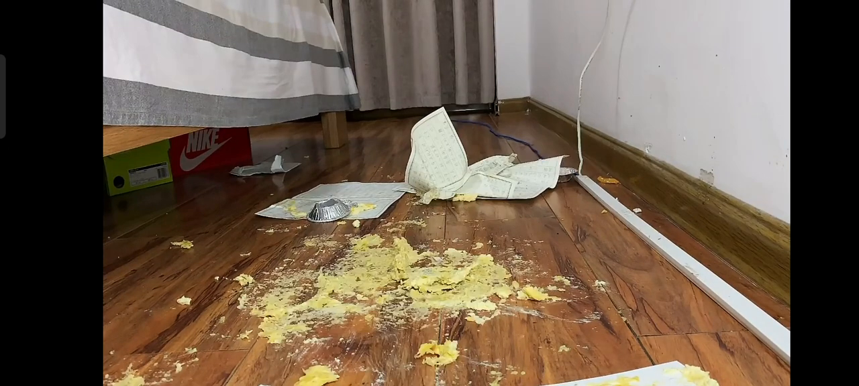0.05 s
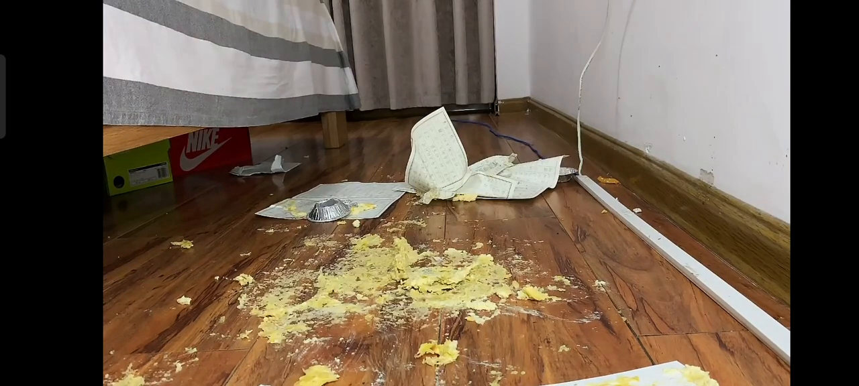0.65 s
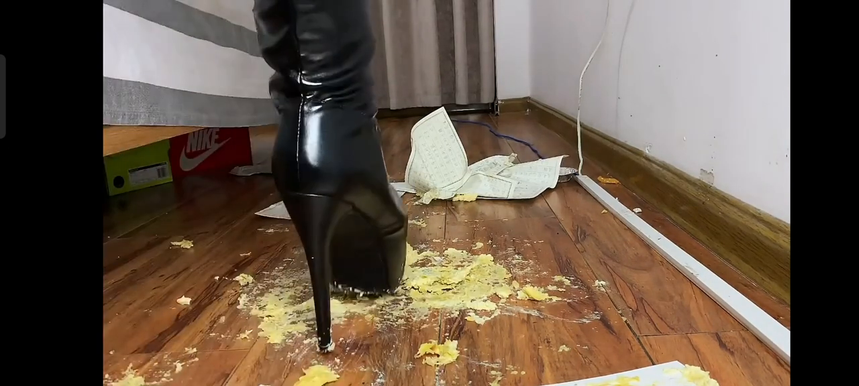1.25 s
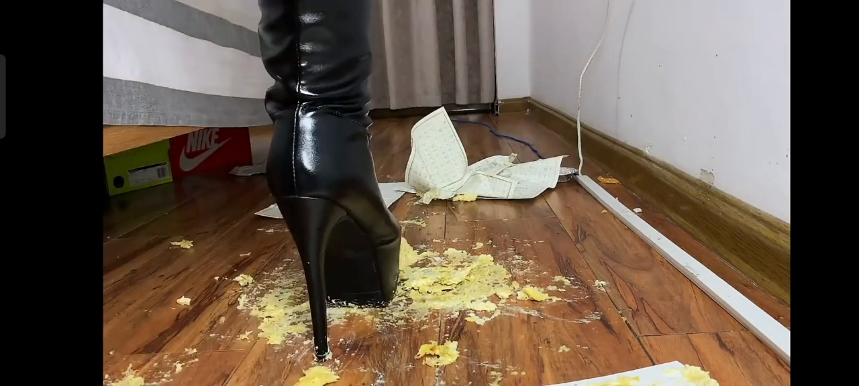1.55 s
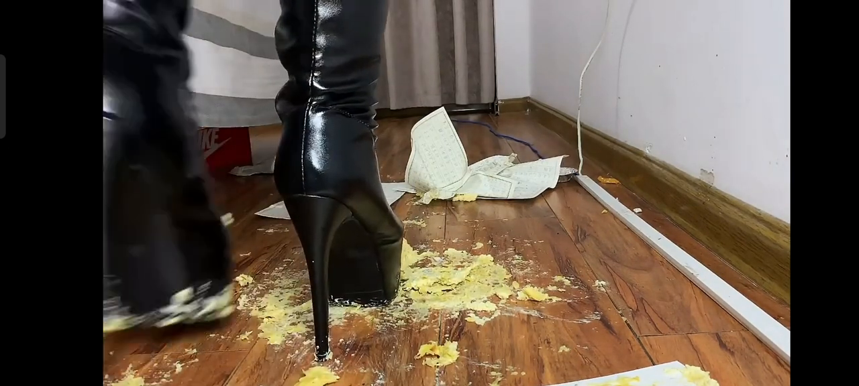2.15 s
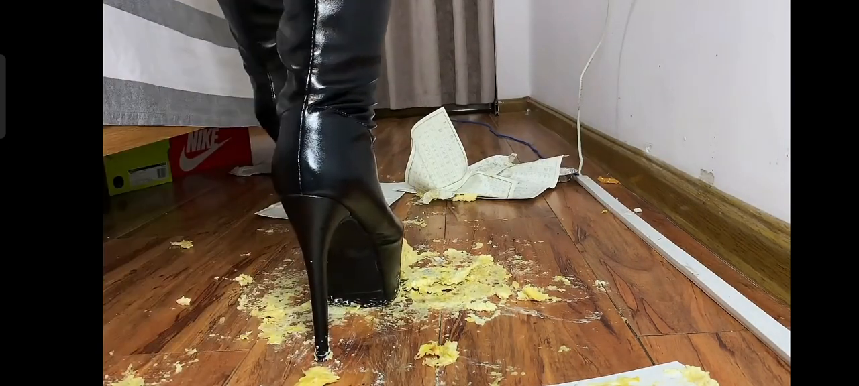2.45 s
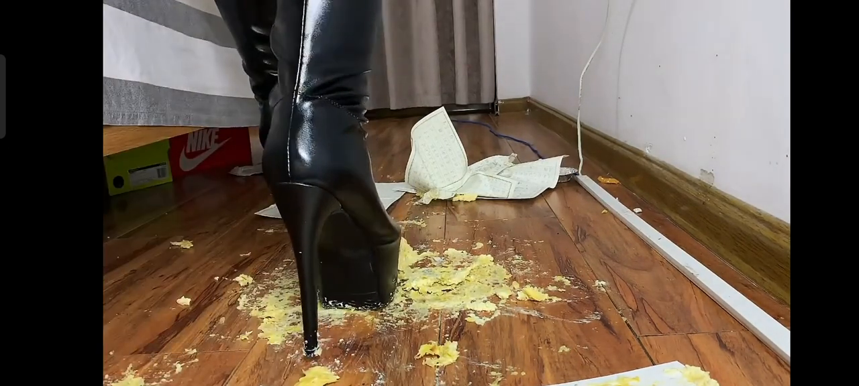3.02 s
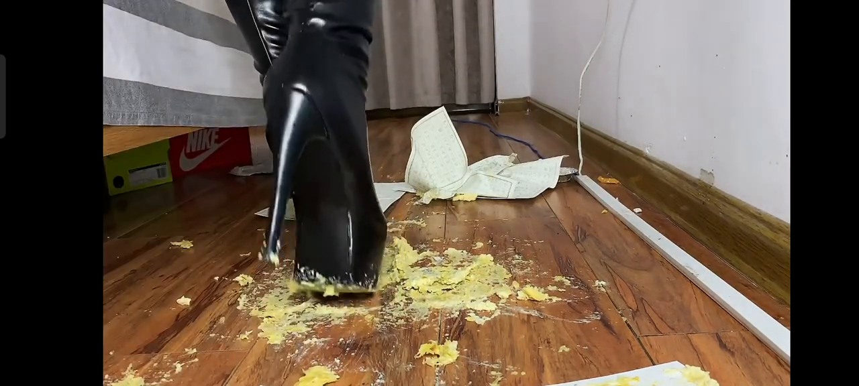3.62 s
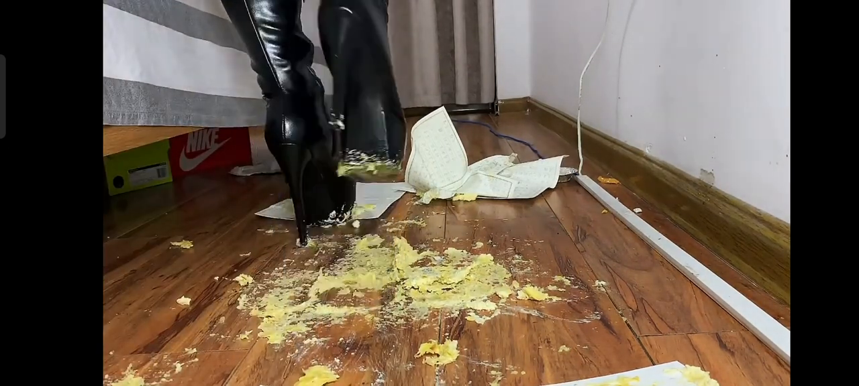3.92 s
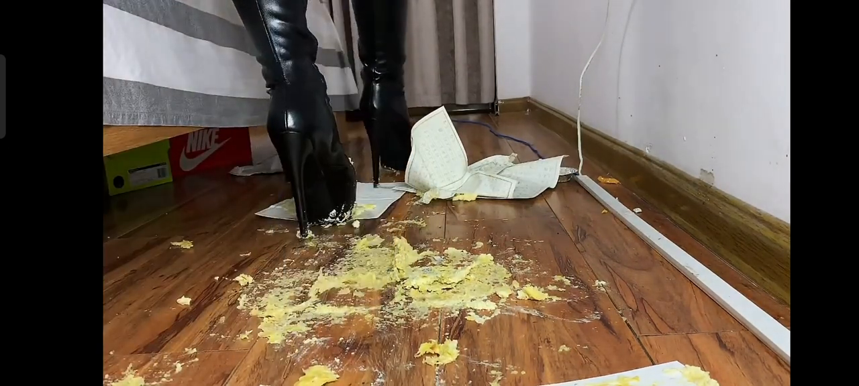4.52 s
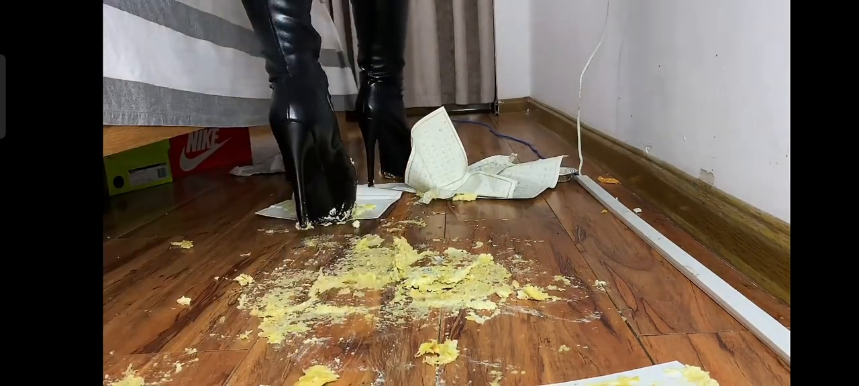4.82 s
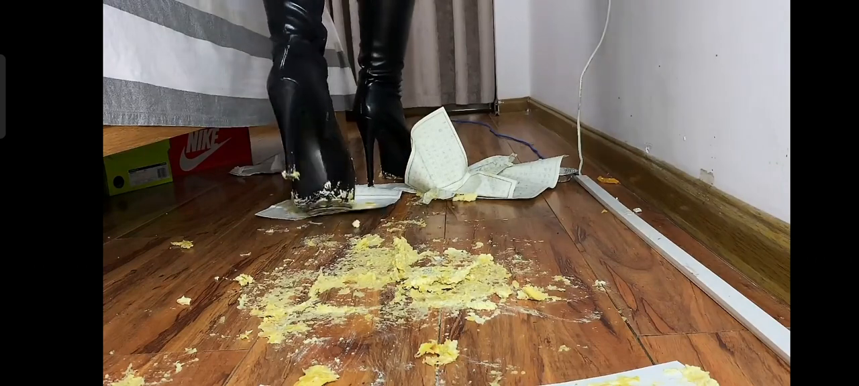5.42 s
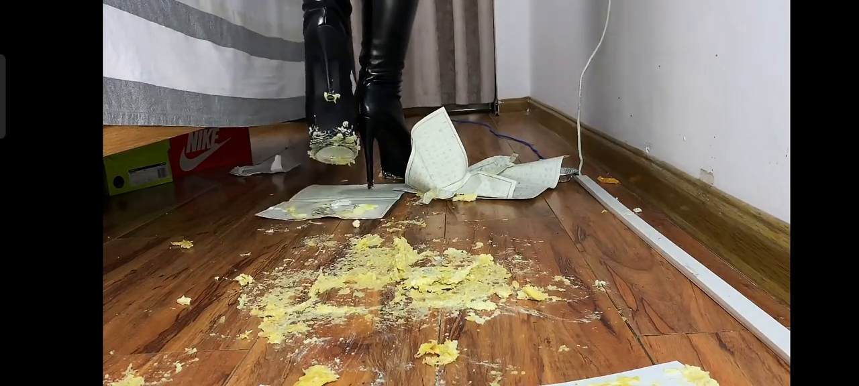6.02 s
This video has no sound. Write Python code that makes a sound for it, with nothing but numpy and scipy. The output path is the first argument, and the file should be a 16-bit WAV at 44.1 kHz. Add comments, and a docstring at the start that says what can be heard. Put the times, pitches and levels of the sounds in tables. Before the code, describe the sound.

High-heeled boots thud down on soft food on a wooden floor, grinding it with wet squishes and crackles, then crinkling paper.

```python
"""Boots stamping on soft food

Platform boots stamp on soft food on a wooden floor in a small room, then grind it and tread on paper.
Each stamp sends a bending wave through the boards, and the floor flexes under the weight. The mush
squirts out, air pockets pop in it, and the twisting sole squeaks and smears it with a fine wet crackle.
Last, the paper crinkles and peels off the boot. A faint rumble and hiss lie under it all."""
import sys
import numpy as np
from scipy import signal
from scipy.fft import rfft, irfft, next_fast_len
from scipy.io import wavfile

SR = 44100
rng = np.random.default_rng(int(sys.argv[2]) if len(sys.argv) > 2 else 0)


def inscribe(sig):
    """Save sig as 16-bit PCM at rate SR to the path in sys.argv[1].

    A 1-D sig is mono; a 2-D sig holds one channel per row.
    Samples are clipped to [-1, 1] before scaling.
    """
    pcm = np.round(np.clip(np.atleast_2d(sig).T, -1, 1) * 32767)
    wavfile.write(sys.argv[1], SR, pcm.astype(np.int16))


N = 276507
TIME = np.arange(N) / SR


def stamps(travel_s=0.003005, bass_hz=175, dip_hz=520, dip_db=-5, crack_hz=2800, rattle_db=-20,
           rattle_s=0.012, touch_db=-24, touch_s=0.0081, squash_db=-33, squash_s=0.011):
    """A blow spreads through the boards as a bending wave, treble first, and leaves them ringing."""
    # sole or heel lands: (time [s], level [dB], pitch [Hz], ringing [dB], softness [no unit], crack [dB])
    blows = [(0.04, -29, 730, -9, 1.34, -55), (1.2071, -2, 547, -24.5, 3.17, -43),
             (1.8875, -29, 804, -45, 2.6, -26), (2.6252, -1.5, 756, -22.5, 5, -39.5),
             (3.961, -19, 506, -13.5, 3.9, -38.5), (4.4095, -9.5, 615, -16, 5.8, -39.5)]
    # the notes the floorboards ring at: (pitch [Hz], level [dB], time to fade by 60 dB [s])
    board_notes = [(78.6, 6.5, 0.8), (174, 4.5, 0.33), (196, -1, 0.54), (262, -1.5, 0.33),
                   (310.7, -10, 0.68), (434.6, -1.5, 0.22), (498, -11, 0.435), (553.5, -6, 0.35),
                   (692, 4.5, 0.15), (726, -29, 0.098), (864, -5.5, 0.5)]
    out, size, lead_s = np.zeros(N), 32768, 0.03
    hz, t = np.arange(size // 2 + 1) * SR / size + 1, TIME[:size]
    bending = np.exp(-4j * np.pi * travel_s * np.sqrt(1000 * hz) - 2j * np.pi * hz * lead_s)

    def noise(spectrum):
        return rms_one(irfft(spectrum * np.exp(2j * np.pi * rng.random(len(hz)))))
    for s, level_db, pitch, ring_db, softness, crack_db in blows:
        shape = (hz / bass_hz) ** 2.635 / (1 + (hz / bass_hz) ** 3)   # small planks give little bass
        shape /= (1 + (hz / pitch) ** (2 * softness)) ** 0.59   # a soft landing cuts the treble
        shape *= from_db(dip_db * bump(hz, dip_hz, dip_hz / 4))   # two board notes partly cancel here
        shape += from_db(crack_db) * bump(hz, crack_hz, crack_hz) ** 2
        wave = shape / shape.max() * bending
        knock = irfft(wave)
        knock /= np.abs(knock).max()
        notes = sum(from_db(db + rng.normal(0, 1) - 60 * t / fade_s) * np.cos(2 * np.pi * note_hz * t)
                    for note_hz, db, fade_s in board_notes)
        ringing = irfft(wave * rfft(notes))
        # the wave comes back from the ends of the planks
        rattle = noise(shape) * t / rattle_s * np.exp(1 - t / rattle_s)
        # the soft food gives way just before the sole meets wood
        squash = noise(shape) * np.exp(-np.abs(t - 2 * lead_s) / squash_s)
        add(out, s - 2 * lead_s, from_db(level_db + squash_db) * squash)
        add(out, s - lead_s - touch_s, from_db(level_db + touch_db) * knock)   # a light first touch
        add(out, s - lead_s, from_db(level_db) * (knock + from_db(ring_db) * ringing))
        add(out, s + travel_s, from_db(level_db + rattle_db) * rattle)
    return out


def pops(gain_db=-12.5, ring_db=4, cavity_db=8.5, cavity_width_hz=110, rise_s=0.0006, fall_s=0.0019,
         stretch_db=-19, stretch_s=0.01, delay_s=0.0019):
    """Each air pocket stretches, tears in a cluster of clicks and rings at a pitch set by its size."""
    # air pockets and crumbs burst: (time [s], level [dB], pitch [Hz], treble [dB])
    bursts = [(0.658, -31, 2450, -39), (0.819, -26, 1320, -5), (0.8926, -17.5, 3320, -11),
              (1.229, -15.5, 2760, -16), (1.5481, -16.5, 5700, -6), (1.579, -23.5, 5750, -10),
              (1.711, -23.5, 4140, -16), (1.886, -19, 2290, -21), (2.6472, -6.5, 1220, -41),
              (2.68, -26, 8500, 5), (2.785, -3, 2410, -12.5), (2.83, -9, 6640, -12), (2.8506, -3, 2570, -4),
              (2.8698, -1.5, 4250, -15.5), (2.891, -6.5, 3200, -8), (2.9607, -6.5, 1940, -15.5),
              (3.0509, -20.5, 2160, -12), (3.131, -24.5, 7840, 3), (3.1868, -11.5, 3350, -12.5),
              (3.3044, -20.5, 3460, -12), (3.44, -18.5, 8170, -9), (3.459, -17.5, 8100, -2),
              (3.5943, -18.5, 1640, -26), (3.687, -20.5, 1280, -3), (3.726, -17, 1580, -11),
              (3.9618, -5, 2880, -52), (3.9715, -11, 2740, -55), (4.16, -27, 2040, -26),
              (4.4367, -7, 4480, -9), (4.6098, -15, 2266, -23), (4.719, -37, 4580, -36.5),
              (4.742, -13.5, 8750, -3), (4.8357, -16, 3190, -14.5), (4.9635, -10, 4000, -12.5),
              (5.0753, -21.5, 4700, -16), (5.177, -20, 4530, -13), (5.1952, -11.5, 5010, -22),
              (5.309, -20.5, 6560, -9), (5.3565, -12.5, 6800, -6.5), (5.457, -13.5, 2420, -10),
              (5.7622, -15, 1950, -5), (5.904, -20.5, 1650, -16)]
    out, lead_s = np.zeros(N), 0.015
    t = TIME[:SR // 12] - lead_s
    tear = np.exp(np.minimum(t / rise_s, -t / fall_s))
    tear += from_db(stretch_db) * np.exp(-np.abs(t) / stretch_s)
    tear_rms = np.sqrt(np.mean(tear ** 2))
    for s, level_db, ring_hz, treble_db in bursts:
        body_db = 1 - 16 * np.log2(ring_hz / 2860)   # a smaller pocket rings higher and has less body
        outline = [(100, body_db - 18), (600, body_db - 8), (1300, body_db), (3000, -1), (6500, 0.49),
                   (11000, treble_db + 4), (16000, treble_db - 1)]

        def tone(hz):
            ring = ring_db * bump(hz, ring_hz, ring_hz) + cavity_db * bump(hz, ring_hz, cavity_width_hz)
            return at_hz(outline, hz) + ring + resonances_db(hz)
        burst = colour(tear * grains(len(t), per_s=14000, spread_db=3), tone)
        add(out, s + delay_s - lead_s, from_db(level_db + gain_db) * tear_rms * burst)
    return out


def squirts(fall_s=0.0067, even_hz=3400, focus_db=9):
    """Mush shoots out in a dense rush of tiny wet bursts, over within a few hundredths of a second."""
    # mush squirts, scuffs or tears loose:
    # (time [s], level [dB], rise [s], hold [s], centre pitch [Hz], highest treble [dB])
    spurts = [(0.572, -45.5, 0.012, 0.013, 655, -10), (1.256, -35, 0.0041, 0.0045, 5450, -16),
              (2.652, -27, 0.0029, 0.044, 1680, -1), (2.653, -23.5, 0.0043, 0.019, 4260, -12.5),
              (2.851, -28, 0.003, 0.035, 4340, -9), (3.952, -19, 0.023, 0.0037, 2420, -31.5),
              (4.433, -30, 0.0071, 0.0069, 5660, -20), (4.445, -34.5, 0.0091, 0.031, 2500, -13),
              (4.737, -45, 0.005, 0.044, 7760, -5), (5.19, -32.5, 0.0016, 0.015, 11400, -10),
              (5.339, -41, 0.014, .008, 6500, -12), (5.425, -36, 0.024, 0.005, 4680, -10),
              (5.465, -32, 0.012, 0.01, 2110, -25), (5.577, -34.5, 0.0035, 0.0048, 1590, -34),
              (5.631, -44, 0.022, 0.019, 4130, -1)]
    out, t = np.zeros(N), TIME[:SR // 4]
    for s, level_db, rise_s, hold_s, centre_hz, treble_db in spurts:
        tilt_db_per_octave = 4 * np.log2(centre_hz / even_hz)   # higher squirts lean towards the treble

        def tone(hz):
            focus = focus_db * bump(hz, centre_hz, centre_hz)
            octaves = np.log2(np.maximum(hz, centre_hz / 2) / centre_hz)
            ends = at_hz([(100, -20), (600, 0), (5000, 0), (16000, treble_db)], hz)
            return focus + tilt_db_per_octave * octaves + ends + resonances_db(hz)
        swell = np.minimum(t / rise_s, 1) ** 0.82
        fade = np.exp(-np.maximum(t - rise_s - hold_s, 0) / fall_s)
        clicks = grains(len(t), per_s=5000, spread_db=4) * from_db(drift(per_s=315)[:len(t)])
        add(out, s, from_db(level_db) * swell * fade * colour(clicks, tone))
    return out


def floor_flexes(swell_s=0.02, octave_db=-14):
    """The floor gives under the weight and swings a few times at its two lowest notes."""
    # the weight shifts: (time [s], level [dB], pitch [Hz])
    shifts = [(0.927, -25.5, 60.3), (0.986, -34, 86.3), (1.249, -36, 64), (2.18, -38, 51.2),
              (2.655, -30.5, 60.7), (3.311, -40, 58), (3.806, -29.5, 73.3), (3.867, -30, 67.8),
              (3.949, -31, 76.3), (4.48, -29, 58.5), (5.815, -42, 78)]
    out, t = np.zeros(N), TIME[:SR // 2]
    swell = (t / (2 * swell_s)) ** 2 * np.exp(2 - t / swell_s)
    for s, level_db, hz in shifts:
        swings = np.sin(2 * np.pi * hz * t) + from_db(octave_db) * np.sin(4 * np.pi * hz * t)
        add(out, s, from_db(level_db) * swings * swell)
    return out


def squeaks(waver=0.03, waver_per_s=500, rough_db=3):
    """The wet sole sticks and slips, making brief whistles of unsteady pitch and strength."""
    # the sole slips: (time [s], level [dB], pitch [Hz], length [s])
    slips = [(2.677, -32, 8300, 0.011), (2.792, -25, 3940, 0.0072), (2.8335, -27, 6380, 0.012),
             (2.846, -28, 1894, 0.0185)]
    out = np.zeros(N)
    for s, level_db, hz, length_s in slips:
        size = round(length_s * SR)
        pitch = hz * (1 + waver * drift(waver_per_s)[:size])
        whistle = np.sin(2 * np.pi * np.cumsum(pitch) / SR)
        whistle *= from_db(rough_db * drift(waver_per_s)[:size])
        add(out, s, from_db(level_db) * rms_one(whistle * signal.windows.tukey(size)))
    return out


def grinding(crackle_db=-5.5, rub_db=2, crumb_db=-4, rest_db=-72, swell_db=4, catch_db=2.7):
    """The sole drags through the mush: fine crackle and sizzle over a duller rub, and crumbs give way."""
    # the sole slides or twists: (time [s], length [s], level [dB], wetness [dB])
    smears = [(0.249, 0.25, -57.5, -1.5), (0.504, .17, -60.5, -9), (0.795, 0.18, -60, -6.5),
              (1.09, 0.31, -70.5, 11), (1.4, 0.092, -61, 5), (1.533, 0.2, -54.5, 6),
              (1.757, 0.091, -49.5, 2), (1.88, 0.74, -107, -15), (2.018, 0.016, -54, -8),
              (2.722, 0.33, -51.5, -4), (3.086, 0.29, -54, -0.5), (3.389, 0.083, -51.5, 5.5),
              (3.482, 0.079, -46, 3), (3.544, 0.28, -65.5, -11), (4.208, 0.054, -65, 3.5)]
    # the tone of the wet sizzle, the crackle and the rub: (frequency [Hz], level [dB])
    sizzle_tone = [(3000, -14), (6000, -3), (8500, -6), (13000, -11), (16000, -13.5)]
    crackle_tone = [(500, 23), (1500, -35.5), (3000, 6), (6000, -5), (8500, 10.5), (12000, -10),
                    (16000, -51)]
    rub_tone = [(150, 8.5), (300, -4), (600, -4), (1000, 0.5), (1700, -2.5), (2600, -5), (5000, -8.5),
                (16000, -39)]
    push, wet_push, dry_push = np.full((3, N), from_db(rest_db))
    for s, length_s, level_db, wetness_db in smears:
        progress = np.clip((TIME - s) / length_s, 0, 1)
        effort = from_db(level_db + swell_db * (progress - 0.5))   # the push grows through each stroke
        effort *= stroke(s, length_s, rise_s=0.051, fall_s=0.017)
        push += effort
        wet_push += effort * from_db(wetness_db)   # wetter mush sizzles more and rubs less
        dry_push += effort * from_db(-wetness_db)
    clumps = from_db(drift(per_s=90) + catch_db * drift(per_s=24.48))   # the sole catches and slips
    sizzle = resonate(clumps * grains(N, per_s=5500, spread_db=2.5), sizzle_tone)
    crackle = resonate(clumps * grains(N, per_s=3000, spread_db=3), crackle_tone)
    rub = colour(clumps * grains(N, per_s=4100, spread_db=4), lambda hz: at_hz(rub_tone, hz))
    crumbs = resonate(grains(N, per_s=70, spread_db=3), crackle_tone)
    crunch = from_db(crackle_db) * crackle + from_db(crumb_db) * crumbs
    return wet_push * sizzle + dry_push * from_db(rub_db) * rub + push * crunch


def paper(clump_db=3.5):
    """Soggy paper creases in uneven clusters while the sole moves on it."""
    # the sole presses on the paper and peels off it: (time [s], length [s], level [dB])
    crumples = [(4.593, .83, -55), (5.468, 0.32, -46.5), (5.781, 0.16, -51.5), (6.183, 0.026, -50)]
    # the tone of the creasing: (frequency [Hz], level [dB])
    paper_tone = [(200, 2.5), (700, 0.5), (1100, -4), (1600, 1), (3500, -4.5), (6000, -8.5), (9000, -14),
                  (13000, -21), (16000, -25)]
    push = sum(from_db(level_db) * stroke(s, length_s, rise_s=0.0083, fall_s=0.012)
               for s, length_s, level_db in crumples)
    creases = grains(N, per_s=3500, spread_db=2.5) * from_db(clump_db * drift(per_s=70))
    return push * resonate(creases, paper_tone)


def resonances_db(hz):
    """Fixed peaks and dips that give the wet sounds and the paper a slightly ringing colour."""
    # peaks and dips in the tone: (centre [Hz], width [Hz], boost [dB])
    resonances = [(1120, 49, 0.5), (1668, 170, 3.5), (2040, 130, 0.5), (2420, 41, 4.5), (2675, 57, 4.5),
                  (3590, 630, 5), (5270, 680, -2.5), (6120, 920, 3), (7200, 210, -5), (8220, 410, 7.5),
                  (12560, 3800, 5)]
    return sum(db * bump(hz, centre, width) for centre, width, db in resonances)


def resonate(clicks, tone):
    """Give clicks their own tone plus the slightly ringing colour."""
    return colour(clicks, lambda hz: at_hz(tone, hz) + resonances_db(hz))


def room(sound, build_s=0.0084):
    """The blurred echoes of a small room, dying sooner in the treble."""
    # how long the echoes last: (frequency [Hz], time to fade by 60 dB [s])
    fade_times = [(100, 0.59), (300, 0.31), (800, 0.31), (2500, 0.2), (7000, 0.23), (15000, 0.075)]
    t, edges = TIME[:SR * 3 // 5], np.geomspace(40, 18000, 11)
    echoes, build_up = np.zeros(len(t)), np.minimum(t / build_s, 1) ** 2
    for low, high in zip(edges, edges[1:]):
        band = signal.butter(2, [low, high], "band", fs=SR, output="sos")
        noise = signal.sosfilt(band, rng.standard_normal(len(t)))
        fade = from_db(-60 * t / at_hz(fade_times, np.sqrt(low * high)))
        echoes += rms_one(noise * fade * build_up) * np.sqrt(2 * (high - low) / SR / len(t))
    return signal.fftconvolve(sound, echoes)[:N]


def background(rumble_db=-49, hiss_db=-63.5, air_db=-59.5):
    """Low rumble, a faint even hiss and dull room noise."""
    # the tone of each steady noise: (frequency [Hz], level [dB])
    rumble_tone = [(15, -30), (30, -11), (50, 4.5), (64, -10), (82, 1.5), (120, -12), (180, -13.5),
                   (300, -18.5), (600, -52.5), (2000, -68)]
    hiss_tone = [(120, -33), (200, -1), (394, -28.5), (899, -3), (2700, -48), (6400, -72), (7410, -58),
                 (8270, -25), (14600, -29), (16000, -72)]
    air_tone = [(150, -0.5), (600, 2), (1600, -0.5), (2600, -12), (5000, -12), (16000, -31)]
    return sum(from_db(db) * colour(rng.standard_normal(N), lambda hz: at_hz(tone, hz))
               for db, tone in [(rumble_db, rumble_tone), (hiss_db, hiss_tone), (air_db, air_tone)])


def grains(size, per_s, spread_db):
    """Tiny clicks at random moments, a few much louder than the rest."""
    happens = rng.random(size) < per_s / SR
    signs = rng.choice([-1, 1], size)
    return happens * signs * from_db(spread_db * np.minimum(rng.exponential(1, size), 4))


def stroke(s, length_s, rise_s, fall_s):
    """One movement of the foot: its strength rises, holds and falls away."""
    t = TIME - s
    return np.clip(t / rise_s, 0, 1) * np.exp(-np.clip((t - length_s) / fall_s, 0, 20))


def drift(per_s):
    """Glide to a new random value per_s times a second."""
    values = rng.standard_normal(4096)
    return np.interp(TIME * per_s, np.arange(len(values)), values)


def colour(sound, db_at):
    """Turn each frequency up or down by db_at(Hz), then scale to an average strength of 1."""
    size = 2 * next_fast_len(len(sound) // 2 + 1)
    hz = np.arange(size // 2 + 1) * SR / size
    cepstrum = irfft(np.log(from_db(db_at(hz))))
    # folding onto the first half makes the filter ring after each click, never before it
    cepstrum[1:size // 2] *= 2
    cepstrum[size // 2 + 1:] = 0
    return rms_one(irfft(rfft(sound, size) * np.exp(rfft(cepstrum)))[:len(sound)])


def bump(hz, centre, width):
    """A smooth hill around one frequency, 1 at the top."""
    return 1 / (1 + (2 * (hz - centre) / width) ** 2)


def at_hz(points, hz):
    """Read between the rows of a (frequency, value) table, with octaves evenly spaced."""
    frequencies, values = np.transpose(points)
    return np.interp(np.log(hz + 1), np.log(frequencies), values)


def from_db(db):
    """Turn decibels into a multiplier."""
    return 10 ** (np.asarray(db) / 20)


def rms_one(sound):
    """Scale to an average strength (rms) of 1."""
    return sound / np.sqrt(np.mean(sound ** 2) + 1e-20)


def add(out, s, sound):
    """Mix a sound in at s seconds."""
    start = max(round(s * SR), 0)
    out[start:start + len(sound)] += sound[:N - start]


def scene(stamp_room_db=-12, near_room_db=-8, far_room_db=-4):
    """Mix everything; the boots step away, so the later mush and paper sounds carry more echo."""
    boards = stamps()
    underfoot = squirts() + pops() + squeaks() + grinding() + paper()
    echo_share = from_db(np.interp(TIME, [3.6, 4.4], [near_room_db, far_room_db]))
    echoes = room(from_db(stamp_room_db) * boards + echo_share * underfoot)
    return (boards + underfoot + floor_flexes() + echoes + background())[None]


def record(dry, cutoff_hz=16100):
    """Flatten peaks that pass full scale and cut the highest treble."""
    treble_cut = signal.ellip(10, 0.1, 80, cutoff_hz, fs=SR, output="sos")
    return signal.sosfilt(treble_cut, np.clip(dry, -1, 1))


dry = scene()
out = record(dry)
inscribe(out)
```